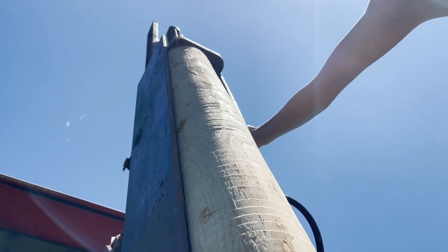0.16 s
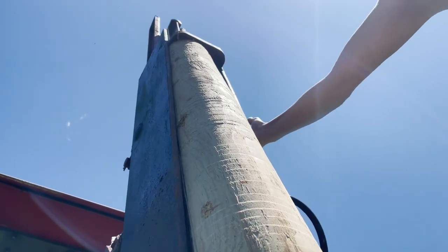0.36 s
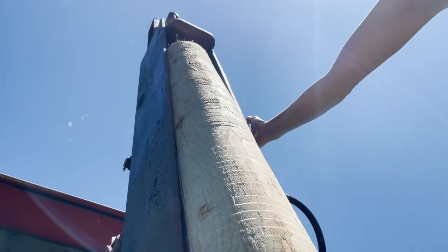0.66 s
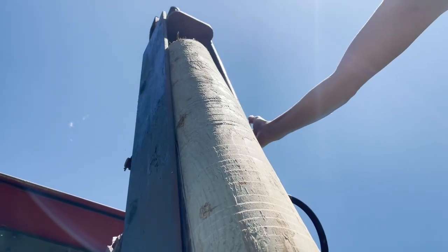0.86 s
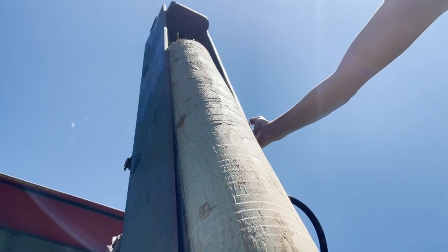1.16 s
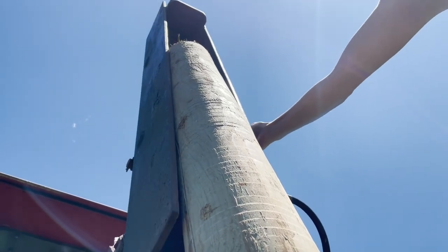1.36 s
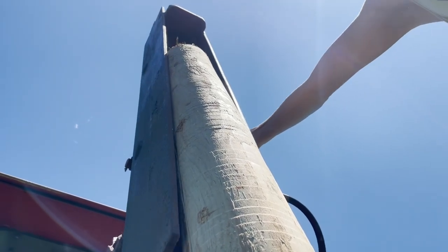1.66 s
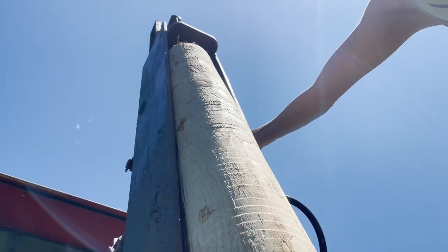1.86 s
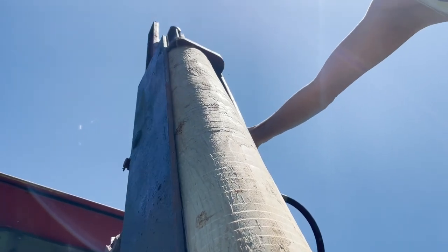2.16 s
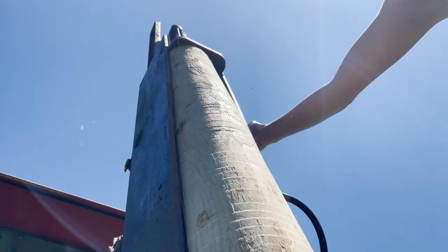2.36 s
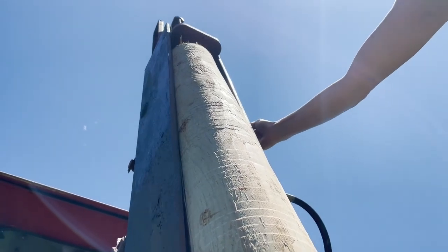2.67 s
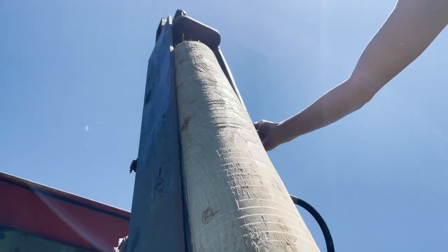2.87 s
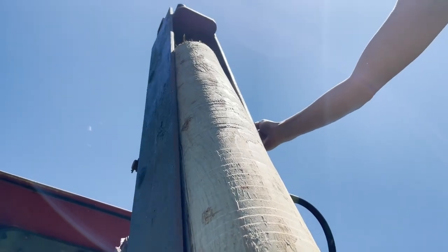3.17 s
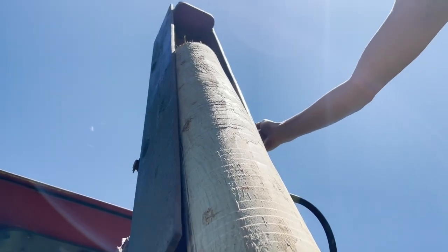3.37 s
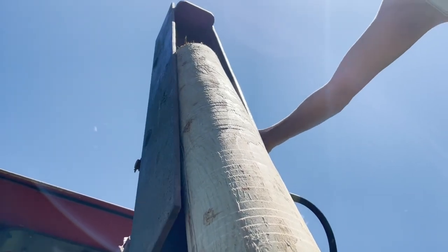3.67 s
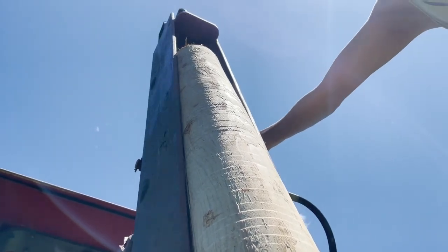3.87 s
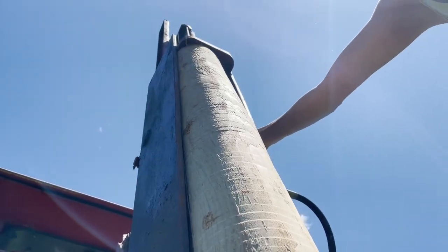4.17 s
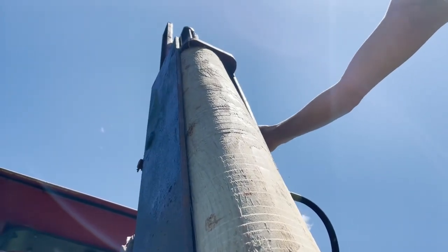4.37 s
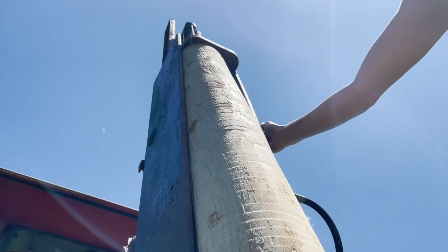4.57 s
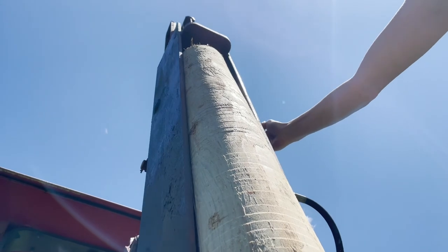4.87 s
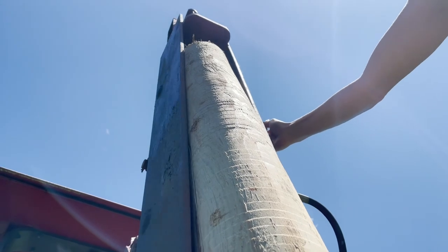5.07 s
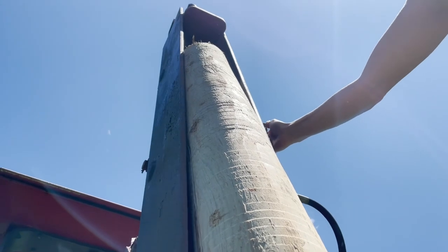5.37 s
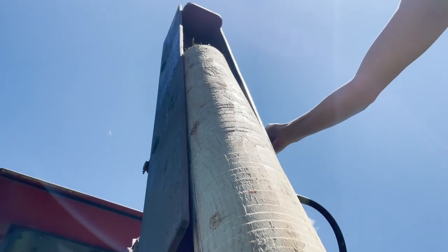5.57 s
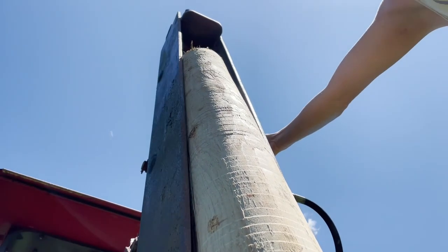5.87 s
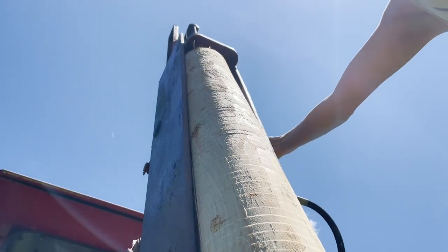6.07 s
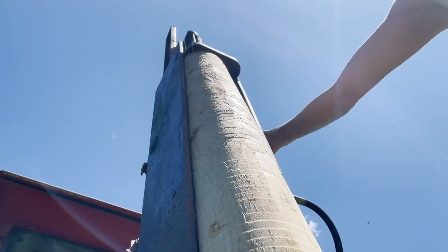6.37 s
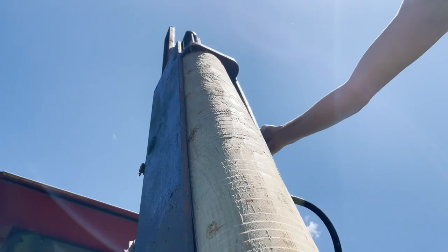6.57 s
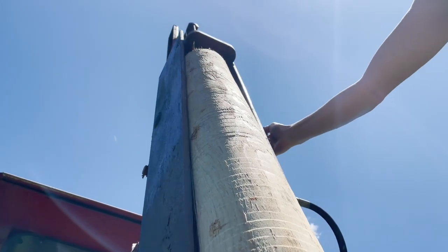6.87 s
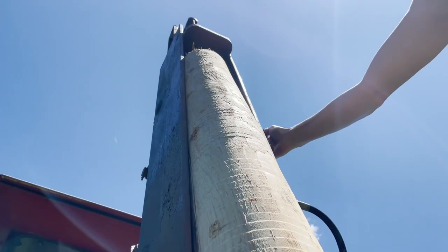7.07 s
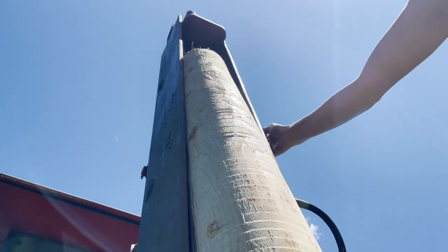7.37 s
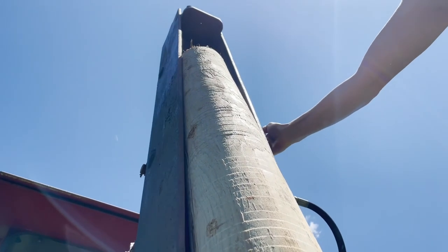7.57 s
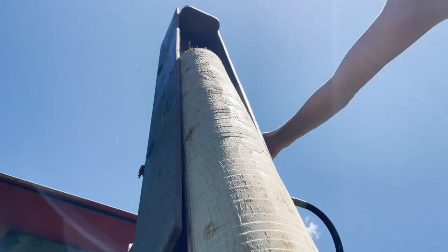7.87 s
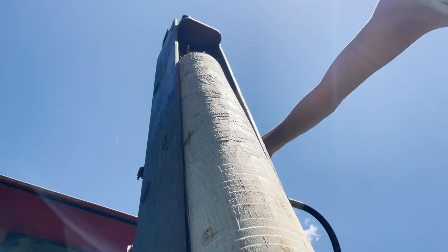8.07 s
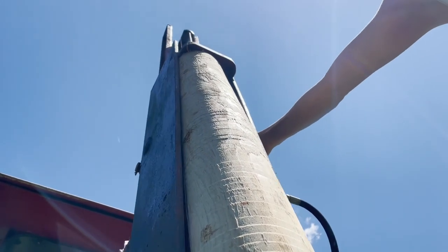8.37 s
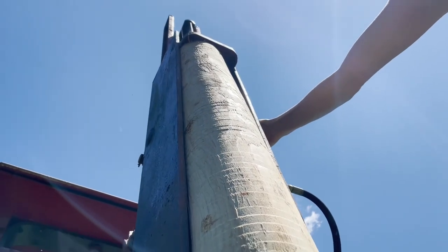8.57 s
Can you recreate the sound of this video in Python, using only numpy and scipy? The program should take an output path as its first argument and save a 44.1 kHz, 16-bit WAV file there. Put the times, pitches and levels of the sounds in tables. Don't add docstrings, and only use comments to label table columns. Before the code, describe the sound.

Outdoors, very close to a tractor-mounted post driver, a diesel drones and ticks steadily. The engine sags as oil lifts the ram; then the ram rasps down its rails and cracks hard onto the wooden post. A brief clang and a softer knock follow each of four blows, with loose steel clanking and oil spitting. A phone at the post's foot dips its bass after every hit.

```python
import sys
import numpy as np
from scipy import signal
from scipy.fft import rfft, irfft, next_fast_len
from scipy.io import wavfile
from scipy.ndimage import uniform_filter1d, map_coordinates

SR = 44100
rng = np.random.default_rng(int(sys.argv[2]) if len(sys.argv) > 2 else 0)


def boost_factor(decibels):
    exponent = np.asarray(decibels, float) / 20
    return 10 ** exponent


def to_wav(sig):
    pcm = np.clip(np.atleast_2d(sig), -1, 1) * 32767
    pcm = np.round(pcm).astype(np.int16)
    wavfile.write(sys.argv[1], SR, pcm.T)


N = 384111

# t/s, peak level/dB, crack re peak/dB, rebound delay/s, rebound level/dB
BLOWS = [
    (1.952, -0.5, -5, 0.062, -27),
    (4.047, -2.5, -4.5, 0.0702, -29.5),
    (6.117, -1, -7.5, 0.065, -25.5),
    (8.275, -2, -16.5, 0.057, -29),
]
EARLIER_BLOW_S = -0.14
# t/s, peak level/dB, level of the oil spit just before/dB
KNOCKS = [
    (0.264, -7, -33),
    (2.347, -8, -37),
    (4.482, -6, -31.5),
    (6.577, -8, -34),
    (8.691, -7.5, -27.5),
]
# t/s, extra sliding level/dB, extra oil level/dB
LIFTS = [
    (0.599, 0.57, -0.24),
    (2.67, 1.57, -0.41),
    (4.848, 2.07, -3.03),
    (6.909, 2.77, -2.3),
]
# f/Hz, level per Hz/dB
SCRAPE = [(150, 1), (300, -8), (480, 1), (700, -3), (1000, 0), (1700, -15), (2000, -6.5), (4000, -29)]
# f/Hz, level per Hz/dB
RASP = [(1500, -7.5), (2300, 3.5), (3300, 0), (4300, -1), (5200, -3.5), (6300, -54), (8000, -47.5)]
# f/Hz, level per Hz/dB
OIL = [(4000, -24), (6000, -4), (7500, 1), (8700, 1.5), (10000, -1), (12000, 0), (13500, -5), (14500, -12),
       (15500, -24), (17000, -50)]


def shape(table, size):
    hz, value = np.transpose(table)
    bins_hz = np.fft.rfftfreq(size, 1 / SR)
    return np.interp(np.log(bins_hz + 20), np.log(np.abs(hz) + 20), value)


def colour(x, table):
    size = next_fast_len(len(x))
    return irfft(rfft(x, size) * boost_factor(shape(table, size)), size)[:len(x)]


def unit(x):
    return x / np.sqrt(np.mean(x ** 2))


def walk(rate):
    k = int(SR / rate)
    held = np.repeat(rng.standard_normal(N // k + 1), k)
    return 2.83 * uniform_filter1d(uniform_filter1d(held, k), k)[:N]


def flicker(x, depth_db, rate, count=12):
    size = next_fast_len(N)
    bins = rfft(x, size)
    octave = np.log2(np.fft.rfftfreq(size, 1 / SR) + 1)
    out = np.zeros(N)
    for centre in range(16 - count, 16):
        band = np.clip(1 - np.abs(octave - centre), 0, 1)
        out += boost_factor(depth_db * walk(rate)) * irfft(bins * band, size)[:N]
    return out


def ring(modes, seconds, rise=.001, spread=1.0):
    t = np.arange(int(seconds * SR)) / SR
    hz, db, t60 = np.transpose(modes)[:, :, None]
    chance = rng.standard_normal((len(modes), 2)).T[:, :, None]
    detune = 1 + 0.00506 * spread ** 2 * chance[1]
    fade = boost_factor(db + 1.6 * spread * chance[0] - 60 * t / t60)
    tones = fade * np.sin(2 * np.pi * hz * detune * t)
    return tones.sum(axis=0) * (1 - np.exp(-t / rise))


def burst(seconds, t60, table):
    t = np.arange(int(seconds * SR)) / SR
    return unit(colour(rng.standard_normal(len(t)), table)) * boost_factor(-60 * t / t60)


def bend(edge_hz, fall_hz, end_hz, seconds):
    t = np.arange(int(3 * seconds * SR)) / SR
    glide_hz = end_hz + fall_hz * np.exp(-t / .008) + edge_hz * np.exp(-t / .0007)
    wave = np.sin(2 * np.pi * np.cumsum(glide_hz) / SR)
    return wave * np.clip(t / .0015, .4, 1) * np.exp(-(t / seconds) ** 5)


def add(out, s, x):
    i = int(s * SR)
    out[i:i + len(x)] += x[:N - i]


def blows():
    # f/Hz, level/dB, time to fall 60 dB/s
    post = [(205.4, -1.5, 0.0474), (374, -54, 0.12), (423, -18.5, 0.143), (509.1, -7, 0.1985),
            (474.6, -24.5, 1), (717, -24.5, 0.303), (885, -17, 0.05), (1040, -54.5, 0.16),
            (1360, -31, 0.49), (1414, -39, 0.075), (1856, -20, 0.093), (2666, -9, 0.0392),
            (2940, -30.5, 0.28), (3852, -28.5, 0.36)]
    # f/Hz, level/dB, time to fall 60 dB/s
    plate_modes = [(4428, -3, 0.302), (4180, 0, 0.13), (4587, -3, 0.14), (4420, 4, 0.186),
                   (4890, -2.5, 0.145), (2947.5, 1.5, 0.172), (539, 9, 0.154), (1421, -1, 0.207)]
    out = np.zeros(N)
    for s, db, crack_db, delay, rebound_db in BLOWS:
        add(out, s + .002, boost_factor(db + 2.5) * bend(2600, 400, 235, .0098))
        add(out, s + .009, boost_factor(db - 1.5) * ring(post, 1.0, rise=0.0039))
        add(out, s + .002, boost_factor(db + crack_db - 7) * burst(.03, .02, RASP))
        add(out, s, boost_factor(db - 9.5) * burst(.3, 0.0988, SCRAPE))
        add(out, s, boost_factor(db - 20.0) * burst(.3, 0.179, RASP))
        plate = ring(plate_modes, .3, rise=0.0088)
        chatter = boost_factor(15 * uniform_filter1d(rng.standard_normal(len(plate)), size=100))
        rebound = plate * chatter + 0.6 * burst(.3, 0.152, RASP)
        add(out, s + delay, boost_factor(rebound_db - 1.5) * rebound)
    add(out, 0, boost_factor(-5) * ring(post, 0.79)[int(-EARLIER_BLOW_S * SR):])
    return out


def settling():
    # f/Hz, level/dB, time to fall 60 dB/s
    seat = [(294.5, -10.5, 0.216), (401.2, 9.5, 0.1207), (480.4, 15, 0.025), (560, 6, 0.0703),
            (757.7, 1.5, 0.114), (903, -15, 0.26), (1042, -31, 0.034), (1348, -8.5, 0.11),
            (1740, -7.5, 0.078)]
    out = np.zeros(N)
    for s, db, _ in KNOCKS:
        add(out, s, boost_factor(db - 3) * bend(200, 220, 300, .011))
        knock = ring(seat, .2, rise=0.00307) + 0.56 * burst(.2, 0.18, SCRAPE)
        add(out, s, boost_factor(db - 12.0) * knock)
    return out


def strokes():
    # t from the valve opening/s, sliding level/dB, oil flow level/dB
    lift = [
        (-.2, -43.5, -57.5),
        (-.04, -41, -64.5),
        (.04, -40.5, -43.5),
        (.3, -41.5, -45.5),
        (.5, -47, -55),
        (.63, -37.5, -53.5),
        (.75, -46, -49),
        (.95, -55.5, -64),
        (1.1, -51, -91.5),
    ]
    # t from the blow/s, sliding level/dB, oil flow level/dB
    drop_course = [
        (-.33, -52.5, -84.5),
        (-.27, -35, -67.5),
        (-.19, -28, -43),
        (-.06, -27, -47.5),
        (-.01, -22.5, -47),
        (.03, -29.5, -41),
        (.15, -41.5, -54),
        (.26, -44, -47),
        (.5, -43.5, -62),
    ]
    rest_db = -72.5
    t = np.arange(N) / SR
    moves = [(lift, row) for row in LIFTS]
    moves += [(drop_course, (s, 0, 0)) for s in [EARLIER_BLOW_S] + [b[0] for b in BLOWS]]
    levels = []
    for c in (1, 2):
        each = []
        for course, row in moves:
            s, db = np.transpose(course)[[0, c]]
            each.append(row[c] + np.interp(t - row[0], s, db, rest_db, rest_db))
        levels.append(np.max(each, axis=0))
    return levels


def ram():
    # f/Hz, width/Hz, level/dB
    rail_modes = [(387.3, 7.3, 2), (480.7, 85, 7.5), (533, 26.5, 3), (864.6, 354, 9), (942, 32, -34),
                  (1035, 21, -4.5), (1366, 235, -0.5), (1504, 144, 0), (1730, 40, -3)]
    scrape_db, oil_db = strokes()
    jerks = rng.standard_normal(N) * (rng.random(N) < .08)
    slips = jerks * boost_factor(1.5 * rng.exponential(size=N) + 1.1 * walk(40))
    rails = np.zeros(N)
    for hz, width, db in rail_modes:
        tone = unit(signal.lfilter(*signal.iirpeak(hz, hz / width, SR), slips))
        rails += boost_factor(db) * tone * boost_factor(2.4 * walk(20))
    scrape = unit(unit(rails) + 0.677 * unit(colour(slips, SCRAPE)))
    early_bass_db, bass_back_s, rail_bass_hz = -5.5, 0.082, 746
    until = np.array([b[0] for b in BLOWS])[:, None] - np.arange(N) / SR
    early = np.clip(until / bass_back_s - 1, 0, 1) * np.clip((.36 - until) / 0.076, 0, 1)
    bass = signal.sosfiltfilt(signal.butter(2, rail_bass_hz, fs=SR, output="sos"), scrape)
    scrape = scrape + bass * (boost_factor(early_bass_db * early.max(axis=0)) - 1)
    rough = colour(slips + 1.5 * rng.standard_normal(N), RASP)
    rasp = unit(flicker(rough, 1.6, 20, count=6))
    hiss = flicker(colour(rng.standard_normal(N), OIL), 1.6, 25, count=5)
    oil = unit(hiss * boost_factor(1.6 * walk(30)))
    rasp_gain = np.hypot(boost_factor(scrape_db - 15.5), boost_factor(oil_db + 1.5))
    return boost_factor(scrape_db + 4.5) * scrape + rasp_gain * rasp + boost_factor(oil_db + 4.5) * oil


def clanks():
    # t/s, peak level/dB, ring f/Hz, rattle re peak/dB
    clank_list = [(0.103, -22, 496.3, -3), (0.519, -16, 390, -25.5), (0.606, -13, 929, -15.5),
                  (0.641, -21, 931, -15), (1.196, -17, 492.5, -13.5), (1.759, -14.5, 1040, -14),
                  (1.894, -9.5, 560, -19), (2.161, -17, 932.5, -16), (2.591, -19.5, 373.2, -29.5),
                  (2.674, -17.5, 597, -8.5), (3.3, -22.5, 502, -26), (3.785, -22.5, 1680, -12),
                  (3.845, -11.5, 1590, -10.5), (4.265, -15.5, 462, -10), (4.72, -21.5, 397.4, -11),
                  (4.764, -8, 399.3, -14), (4.794, -14, 1002, -7), (4.744, -14.5, 535, -17.5),
                  (5.483, -24, 1676, -10), (5.688, -35, 440, 4), (5.889, -12.5, 862, -12),
                  (6.089, -6.5, 371, -9), (6.201, -11.5, 460.5, -18), (6.223, -11, 500.5, -12.5),
                  (6.315, -16.5, 899.6, -17), (6.798, -15.5, 405.4, -21.5), (7.053, -26.5, 926, -19.5),
                  (7.5, -22.5, 527, -15.5), (8.493, -16.5, 477.6, -12.5), (8.642, -29, 510, 14.5)]
    t60 = 0.169
    out = np.zeros(N)
    for s, db, hz, rattle_db in clank_list:
        jar = boost_factor(30 * uniform_filter1d(rng.standard_normal(SR // 4), size=150))
        modes = [(hz, 0, t60), (.95 * hz, -4, 0.39 * t60), (1.6 * hz, -4, 0.39 * t60),
                 (2.1 * hz, -12, 1.24 * t60)]
        add(out, s, boost_factor(db - 9.5) * jar * ring(modes, .25, rise=0.005))
        add(out, s, boost_factor(db - 21) * burst(.15, 1.3 * t60, SCRAPE))
        add(out, s, boost_factor(db + rattle_db - 10) * burst(.15, 0.632 * t60, RASP))
    return out


def oil_spits():
    # t from the blow/s, peak level/dB
    spit_list = [
        (-.084, -32.5),
        (0.169, -36),
        (.275, -41),
    ]
    last_spit_s, lift_spit_db = .363, -42.5
    hits = [EARLIER_BLOW_S] + [b[0] for b in BLOWS]
    spits = [(b + s, db) for b in hits for s, db in spit_list if b + s > 0]
    spits += [(b + last_spit_s, knock[2]) for b, knock in zip(hits, KNOCKS)]
    spits += [(row[0], lift_spit_db) for row in LIFTS]
    swell = np.clip(np.arange(SR // 10) / SR / 0.0086, 0, 1)
    out = np.zeros(N)
    for s, db in spits:
        add(out, s, boost_factor(db + 6.5) * burst(.1, 0.068, OIL) * swell)
    return out


def engine():
    # t/s, shaft speed f/Hz
    shaft = [(0.0, 27.91), (0.5, 26.78), (1.0, 25.75), (1.5, 25.74), (2.0, 26.93), (2.5, 27.09),
             (3.0, 25.89), (3.5, 25.55), (4.0, 26.55), (4.5, 27.25), (5.0, 26.14), (5.5, 25.53),
             (6.0, 26.38), (6.5, 27.31), (7.0, 26.3), (7.5, 25.55), (8.0, 26.14), (8.75, 27.43)]
    # multiple of shaft speed, level running free/dB, level under load/dB
    exhaust_tones = [(1, -52, -58), (1.5, -48, -62), (2, -23.5, -28.5), (2.5, -44, -45), (3, -33, -28),
                     (3.5, -52, -54), (4, -31, -36.5), (5, -54, -38), (6, -36, -31.5), (6.33, -52, -43),
                     (6.5, -58, -53), (7, -55, -54), (8, -54, -62), (9, -50, -57), (10, -51, -47),
                     (11, -56, -54), (12, -62, -60)]
    # f/Hz, level per Hz/dB
    block_noise = [(42, -86.5), (65, -63.5), (150, -58), (210, -63), (300, -68), (480, -72), (700, -76),
                   (1000, -78), (1700, -77), (2000, -84.5), (3200, -85), (5000, -94), (6500, -98.5),
                   (12000, -99), (15500, -116)]
    # f/Hz, level/dB, time to fall 60 dB/s
    tick_modes = [(3350, -37, .024), (3550, -35.5, .022), (3950, -38, .022), (4250, -41, .02),
                  (5100, -45, .02)]
    free_hz, loaded_hz = 27.2, 25.7
    s, speed = np.transpose(shaft)
    place = np.interp(np.arange(N) / SR, s, np.arange(len(s)))
    hz = map_coordinates(speed, [place], mode="nearest")
    load = np.clip((free_hz - hz) / (free_hz - loaded_hz), 0, 1)
    turns = np.cumsum(hz) / SR - .06
    exhaust = np.zeros(N)
    for k, free, loaded in exhaust_tones:
        lag = .85 * (k - 2) * (k - 4.9) + np.pi * (k > 5)
        gain = np.sqrt(2) * boost_factor(free + load * (loaded - free) + .6 * walk(6))
        exhaust += gain * np.cos(2 * np.pi * k * turns - lag)
    late = (turns - .88) % 1
    puff = 1 + .5 * np.exp(-late / 0.0433)
    noise = colour(rng.standard_normal(N), block_noise)
    block = flicker(noise, 1.14, 12) * np.sqrt(SR / 2) * puff
    ticks = np.zeros(N)
    for i in np.flatnonzero(np.diff(late) < 0):
        tick = ring(tick_modes, .04, rise=.002, spread=1.9) + boost_factor(-50) * burst(.04, .03, OIL)
        add(ticks, i / SR, boost_factor(1.5 + 1.8 * rng.standard_normal()) * tick)
    turned_down = boost_factor(-6 * duck())
    return exhaust + block * turned_down, ticks * turned_down


def duck():
    hold_s, recover_s = 0.1495, 0.0884
    starts = np.array([EARLIER_BLOW_S] + [b[0] + 0.0178 for b in BLOWS])
    since = np.arange(N) / SR - starts[:, None]
    down = np.clip(since / 0.0095, 0, 1)
    return (down * np.clip(1 - (since - hold_s) / recover_s, 0, 1)).max(axis=0)


def ports(sound, t60, dryness):
    # f/Hz, phase/radians
    lead = [(0, 0), (60, .12), (200, .85), (450, .4), (1600, .7), (2300, 3.1), (3200, 6.2), (4500, 6.8),
            (5600, 5.9), (7500, 3.95), (8300, 3.3), (8900, 3.0), (9600, 2.35), (12000, .95), (14000, .15)]
    # f/Hz, share/0-1
    likeness = [(60, 1), (130, .995), (220, .96), (450, .9), (1000, .5), (1600, .65), (2500, .4),
                (4000, .65), (6300, .55), (8000, .96), (9200, .96), (11000, .85), (14000, .97)]
    # f/Hz, difference/dB
    left_db = [(60, -.4), (160, -1.5), (300, 2), (450, 1.5), (900, 4), (1600, 0), (2000, 1), (3200, 5),
               (5000, 3), (8000, 0)]
    size = next_fast_len(N + SR // 4)
    direct = shape(likeness, size) ** dryness
    side = np.array([[1], [-1]]) / 2
    fade = boost_factor(-60 * np.arange(SR // 4) / SR / t60)
    echoes = rng.standard_normal((2, SR // 4)) * fade / np.sqrt(np.sum(fade ** 2))
    scatter = rfft(echoes, size)
    both = np.sqrt(direct) * np.exp(1j * side * shape(lead, size)) + np.sqrt(1 - direct) * scatter
    balance = boost_factor(side * shape(left_db, size))
    return irfft(rfft(sound, size) * both * balance, size)[:, :N]


def scene():
    drone, ticks = engine()
    broad = drone + ram()
    sharp = ticks + blows() + settling() + clanks() + oil_spits()
    return ports(broad, .3, 1) + ports(sharp, .07, .5)


def band_limit(x):
    return signal.sosfilt(signal.butter(12, 15720, fs=SR, output="sos"), x)


def record(dry):
    duck_db = -11.5
    bass = signal.sosfiltfilt(signal.butter(2, 230, fs=SR, output="sos"), dry)
    ducked = dry + bass * (boost_factor(duck_db * duck()) - 1)
    rounded = np.tanh(0.986 * ducked) / 1.1402
    top = signal.butter(12, 14700, fs=SR, output="sos")
    mix = signal.sosfilt(top, rounded)
    return band_limit(mix)


dry = scene()
out = record(dry)
to_wav(out)
```